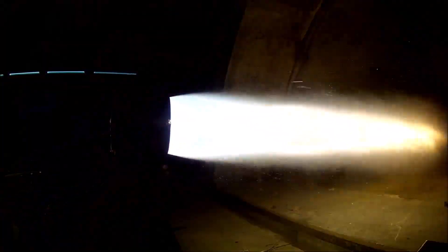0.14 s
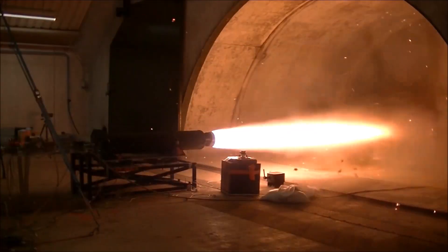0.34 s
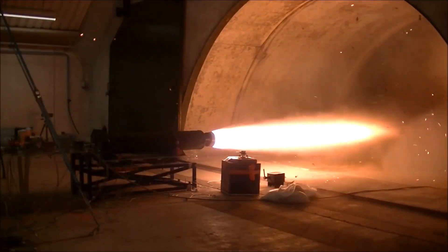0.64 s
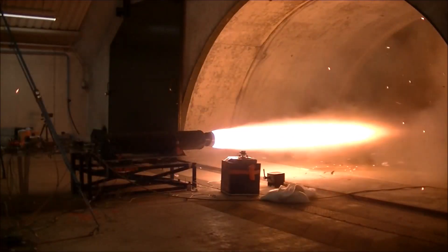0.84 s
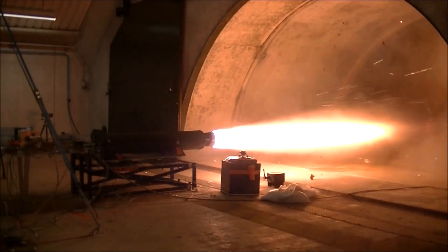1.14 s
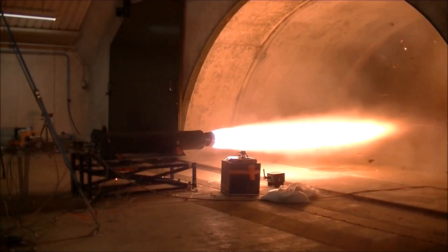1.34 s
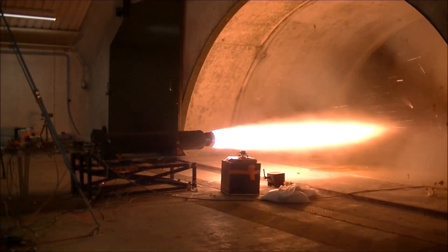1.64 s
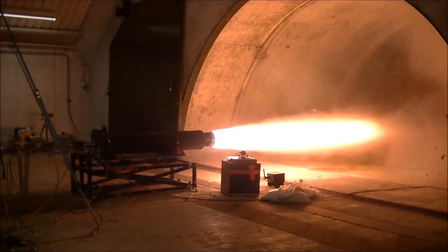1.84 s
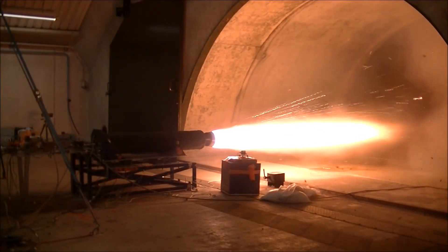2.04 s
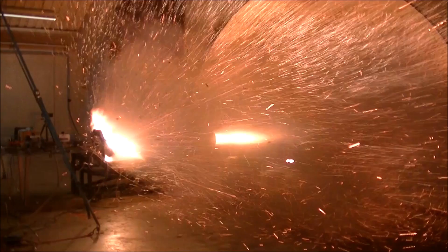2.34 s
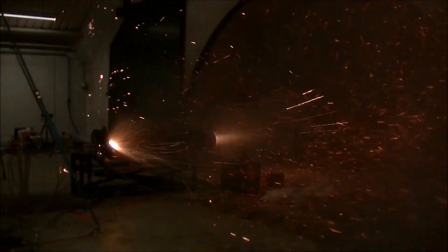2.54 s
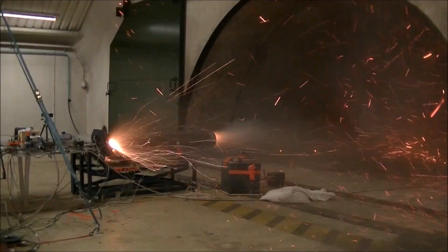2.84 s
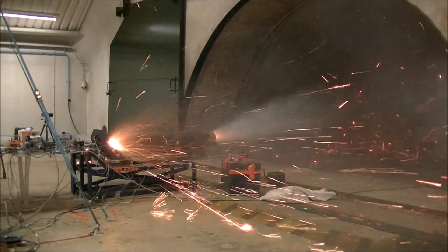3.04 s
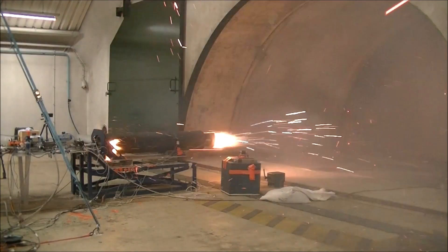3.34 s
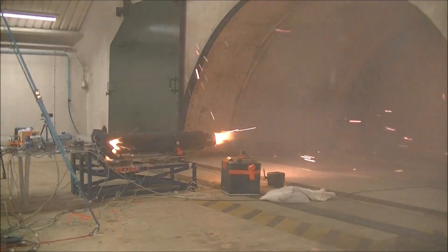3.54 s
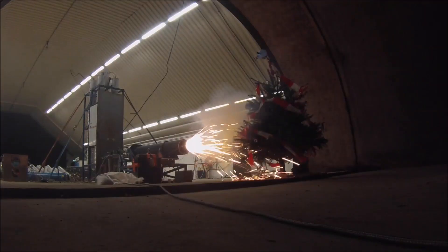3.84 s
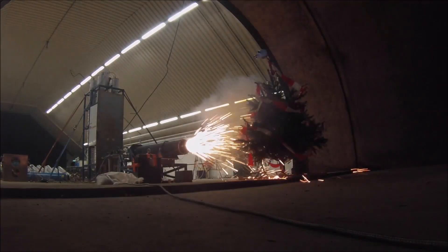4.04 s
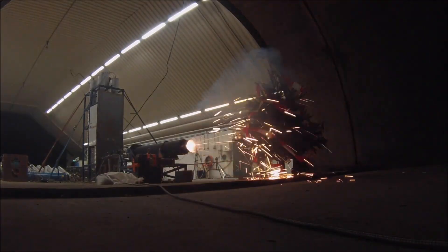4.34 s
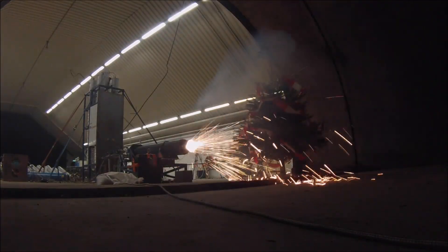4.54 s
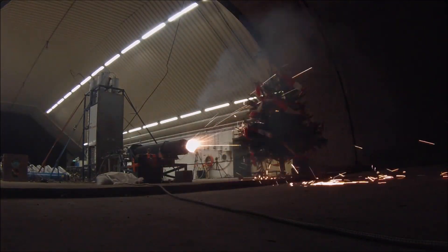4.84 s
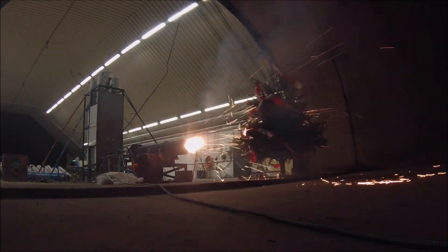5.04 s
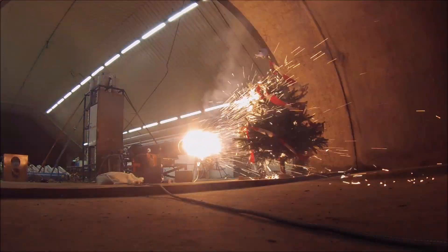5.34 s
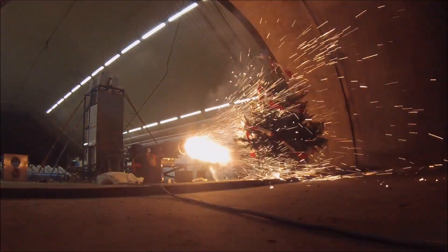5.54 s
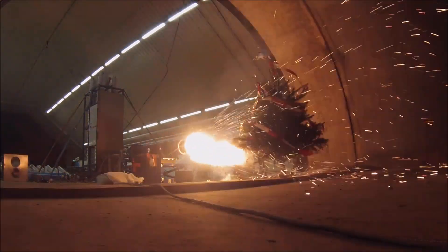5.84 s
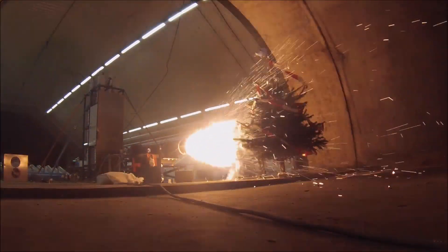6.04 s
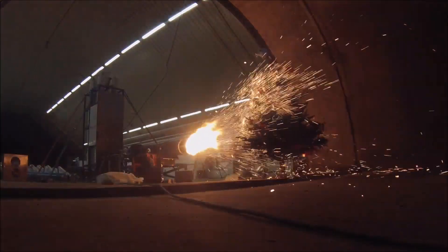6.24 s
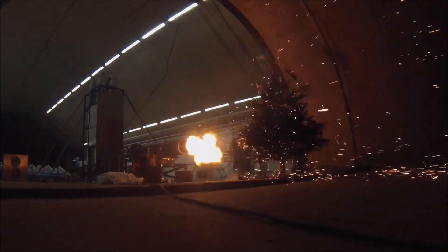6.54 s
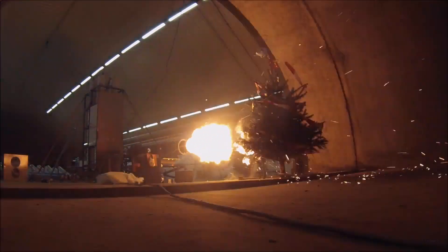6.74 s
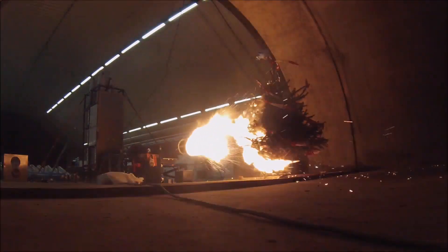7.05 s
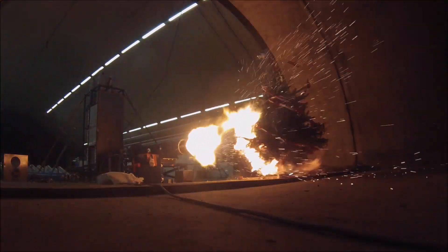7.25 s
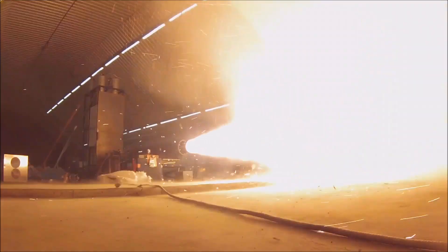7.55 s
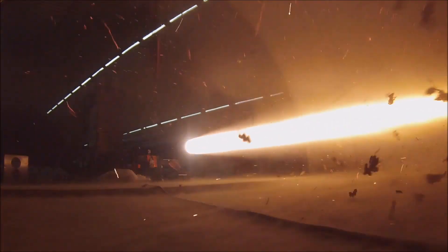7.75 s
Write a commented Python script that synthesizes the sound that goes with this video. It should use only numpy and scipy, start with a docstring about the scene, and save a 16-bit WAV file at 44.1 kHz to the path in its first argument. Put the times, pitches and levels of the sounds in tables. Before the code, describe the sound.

A loud bright rocket jet hiss dulls and fades, then abruptly a second motor chugs hollowly, rasps and spits sparks, thumps and bursts into a roaring jet.

```python
"""Two rocket motors fire in a concrete tunnel, one after the other; the scene changes abruptly from the first
to the second. The first is a steady, bright jet hiss: noise in three bands, read slower and dulled as the motor
burns out. The second starts on its igniter: noise through casing and tunnel resonances roars hollowly, and
filtered noise rasps, wheezes and spits sparks. Then the fuel lights with a thump, one swing of pressure, and a
full jet saturates the microphone. The first motor is in stereo, the second the same in both channels."""
import sys
import numpy as np
from scipy import signal
from scipy.fft import rfft, irfft, next_fast_len
from scipy.io import wavfile
from scipy.ndimage import uniform_filter1d, map_coordinates

SR = 44100
rng = np.random.default_rng(int(sys.argv[2]) if len(sys.argv) > 2 else 0)


def unload_wav(signal):
    """Save mono or channel-first audio to the path in sys.argv[1] as 16-bit WAV at rate SR, clipped to [-1, 1]."""
    wavfile.write(
        sys.argv[1],
        SR,
        np.round(np.clip(np.atleast_2d(signal).T, -1, 1) * 32767).astype(np.int16),
    )


N = 348831
TIME = np.arange(N) / SR
SIZE = next_fast_len(N, True)
FREQS = np.maximum(np.fft.rfftfreq(SIZE, 1 / SR), 1)

# the scene changes to the second motor; its ignition thump; its fuel lights
SCENE_CHANGE_S, THUMP_S, LIGHT_S = 3.797, 7.384, 7.405

# Resonances of the motor casing. Each row: centre in Hz, width in Hz, level in dB.
CASING_RESONANCES = [(265, 63, -6.5), (337.2, 15.7, -0.5), (411, 34, -6.5), (480.5, 28.5, -7.5),
                     (582, 83, -17)]
# Colour of the rasp at the nozzle. Each row: frequency in Hz, relative level in dB.
RASP_COLOUR = [(500, -10.5), (720, -0.5), (900, -8.5), (1100, -4), (1250, 0), (1430, -5), (1600, -11.5),
               (2000, -15), (2400, -28), (4000, -58)]
# Colour of the sparks' fizz. Each row: frequency in Hz, relative level in dB.
FIZZ_COLOUR = [(1800, -10), (2700, -3.5), (3200, 3), (3800, -0.5), (4300, -2.5), (4900, 1), (6000, 2),
               (6600, -5), (7100, -11), (7900, -4), (8700, -15), (10500, -17), (15000, -44)]


def from_db(db):
    """Decibels to gain."""
    return 10 ** (np.asarray(db) / 20)


def rms_one(x):
    """Scale to rms 1."""
    return x / np.sqrt(np.mean(x ** 2) + 1e-20)


def curve(rows):
    """Interpolate rows of (seconds, value) to one value a sample."""
    seconds, values = np.transpose(rows)
    return np.interp(TIME, seconds, values)


def since(start):
    """Seconds gone by since a moment; 0 before it."""
    return np.maximum(TIME - start, 0)


def after(start, fade):
    """A ramp from 0 to 1, fade seconds long and centred on a moment."""
    return np.clip((TIME - start) / fade + .5, 0, 1)


def swell(s, width):
    """A smooth bump of height 1 around a moment."""
    return np.exp(-((TIME - s) / width) ** 2)


def colour(points):
    """Gain at each frequency from (Hz, dB) points."""
    hz, db = np.transpose(points)
    return from_db(np.interp(np.log(FREQS), np.log(hz), db))


def resonances(modes):
    """Gain at each frequency of independently driven resonances, given as (Hz, width Hz, dB)."""
    power = 0
    for hz, width, db in modes:
        detuning = (FREQS ** 2 - hz ** 2) / (FREQS * width)
        power = power + from_db(db) ** 2 / (1 + detuning ** 2)
    return np.sqrt(power)


def below(hz, order=4):
    """Gain of a smooth low-pass."""
    return 1 / np.sqrt(1 + (FREQS / hz) ** (2 * order))


def above(hz, order=4):
    """Gain of a smooth high-pass."""
    return 1 / np.sqrt(1 + (hz / FREQS) ** (2 * order))


def filtered(x, gain):
    """Give a sound the given gain at each frequency."""
    return irfft(rfft(x, SIZE) * gain, SIZE)[:N]


def noise(gain):
    """Random turbulence with the given gain at each frequency; rms 1."""
    return rms_one(filtered(rng.standard_normal(SIZE), gain))


def flutter(rate_hz, depth_db):
    """A factor that wanders at random, mostly slower than rate_hz, with an rms swing of depth_db."""
    return from_db(depth_db * noise(below(rate_hz, order=2)))


def steadied(x, span):
    """Hold the level over a span in seconds at 1 and keep the quicker beating."""
    return x / np.sqrt(uniform_filter1d(x ** 2, max(int(span * SR), 1)) + 1e-9)


def hollow_note(hz, half_width_hz):
    """A narrow, noisy resonance that follows a moving pitch."""
    phase = 2 * np.pi * np.cumsum(hz) / SR
    narrow = below(half_width_hz, order=2)
    return noise(narrow) * np.cos(phase) + noise(narrow) * np.sin(phase)


def reflections(strength, count=8):
    """Echoes from floor and walls comb a fine, steady ripple into the spectrum."""
    delays_s = rng.uniform(.002, .03, count)
    echoes = np.exp(-2j * np.pi * FREQS * delays_s[:, None]).sum(axis=0)
    return np.abs(1 + strength * echoes)


def jet(core_db, body_db, fine_db, points, speed=1):
    """Mixing noise of a plume, pitched by exhaust speed: large eddies give body, the smallest fine hiss."""
    low_hz, high_hz = 3300, 6200   # body below, fine hiss above, core between
    position = np.cumsum(speed * np.ones(N))   # a slower exhaust reads the eddies out more slowly
    eddies = map_coordinates(noise(colour(points)), [position], order=3, mode="mirror")
    body = filtered(eddies, below(low_hz, order=8) ** 2)
    core = filtered(eddies, (above(low_hz, order=8) * below(high_hz, order=8)) ** 2)
    fine = filtered(eddies, above(high_hz, order=8) ** 2)
    body = steadied(body, span=0.21)
    core = steadied(core, span=0.35)
    fine = steadied(fine, span=0.59) * flutter(rate_hz=60, depth_db=0.57)
    return from_db(core_db) * (core + from_db(body_db) * body + from_db(fine_db) * fine)


def first_motor(burnout_dulling=0.74):
    """A jet that dulls as it slows; the microphone rounds its peaks, the tunnel spreads its low part wide."""
    # Colour of the first plume. Each row: frequency in Hz, relative level in dB.
    burn_colour = [(90, -43), (170, -35.5), (280, -19), (600, -15.5), (1000, -13), (2000, -6.5), (3000, -3),
                   (3700, -3), (4500, -2.5), (5400, -4.5), (7000, -11), (9500, -12.5), (12000, -18),
                   (15800, -25.5)]
    # Stereo spread of the plume. Each row: frequency in Hz, side-to-mid ratio in dB, relative.
    burn_width = [(60, -16), (110, 17), (200, 15.5), (380, 8.5), (700, 7.5), (1290, 3), (2380, -3),
                  (4400, -6), (8120, -6), (15000, -111)]
    # full thrust ahead of the microphone: the core, and the low body and fine hiss re the core
    full_core_db, full_body_db, full_fine_db = -21, -6.5, -4
    # the fuel runs low: the exhaust slows, then the flame goes out
    tail_off_s, slowing_per_s = 2.65, .22
    burnout_s, burnout_db_per_s = 3.557, 25
    # change for each dB of exhaust speed; body and fine hiss re the core
    core_follows, body_follows, fine_follows = 0.92, -2.3, 2.9
    # the fine hiss opens up at the start, while the low body settles
    opening_s, opening_fine_db, opening_body_db = 0.21, -4.5, 2

    speed = 1 - slowing_per_s * since(tail_off_s).clip(max=SCENE_CHANGE_S - tail_off_s)
    speed_db = 20 * np.log10(speed)
    opening = np.maximum(1 - TIME / opening_s, 0)
    burnout_db = -burnout_db_per_s * since(burnout_s).clip(max=SCENE_CHANGE_S - burnout_s)
    dulling_db = burnout_dulling * burnout_db
    core_db = full_core_db + core_follows * speed_db + burnout_db
    body_db = full_body_db + body_follows * speed_db - dulling_db + opening_body_db * opening
    fine_db = full_fine_db + fine_follows * speed_db + dulling_db + opening_fine_db * opening
    plume = jet(core_db, body_db, fine_db, burn_colour, speed)

    ceiling = .245   # the microphone's limit, full scale 1
    direct = ceiling * np.tanh(from_db(3.5) * plume / ceiling)
    direct = signal.sosfilt(signal.butter(2, 205, "high", fs=SR, output="sos"), direct)
    floor = from_db(-62.5) * noise(below(87, order=3))   # faint rumble of the tunnel
    spread = from_db(-28.7) * noise(colour(burn_colour) * colour(burn_width))
    spread = spread * np.sqrt(from_db(core_db - full_core_db))   # the echoes fade more slowly than the jet
    stereo = direct + floor + spread * [[1], [-1]]
    return stereo * from_db([[-.15], [.15]])   # slightly louder on the right


def casing_roar(flow_db, upper_ratio=1.72):
    """Burning gas drives the casing in chugs; two resonances climb with the hot chamber's speed of sound."""
    # level at peak flow, and the share of the flow's swing that it follows
    roar_db, roar_follows = -12, 0.52
    # a hollow note sets in and rises as the chamber heats, then sinks into the roar
    heat_s, heating_s, cold_hz, hot_hz = 4.27, .62, 248.7, 360.5
    start_db, hold_s, fade_db_per_s, late_db = -2.5, 0.75, 14, -11
    chug_hz, chug_width_hz, chug_rms_db = 8, 4.7, 1.0
    boom_width_s, boom_db = 0.026, 4.5   # the casing booms with the ignition thump
    lit_fade_db_per_s = 34   # once the fuel lights, the roar dies away in the tunnel

    note_hz = hot_hz + (cold_hz - hot_hz) * np.exp(-since(heat_s) / heating_s)
    note_db = np.maximum(start_db - fade_db_per_s * since(heat_s + hold_s), late_db)
    lower = steadied(hollow_note(note_hz, half_width_hz=14.6), span=.15)
    upper = from_db(-8.5) * hollow_note(note_hz * upper_ratio, half_width_hz=14)
    fixed_modes = noise(resonances(CASING_RESONANCES) * above(282, order=4) * below(600, order=5))
    roar = fixed_modes + after(heat_s, fade=0.097) * from_db(note_db) * (lower + upper)

    chug_db = chug_rms_db * noise(resonances([(chug_hz, chug_width_hz, 0)]) ** 2)
    level_db = roar_db + roar_follows * flow_db + chug_db
    level_db = level_db + boom_db * swell(THUMP_S, boom_width_s) - lit_fade_db_per_s * since(LIGHT_S)
    return from_db(level_db) * steadied(roar, span=.07)


def flame(flow_db, howl_hz=1290):
    """The flame shakes the tunnel's low modes and rasps at the nozzle with a wavering howl."""
    # Low resonances of the tunnel. Each row: centre in Hz, width in Hz, level in dB.
    tunnel_modes = [(16, 14, -10), (35, 9.7, -16), (62, 15, -6), (78.9, 8.4, 3), (99, 18, -23),
                    (117.5, 24, -2.5), (181, 52, -12)]
    # The rumble swells as the fuel starts to smoulder. Each row: time in seconds, level in dB.
    rumble_level = [(3.81, -35.5), (4.03, -34), (4.2, -22), (4.6, -25), (5.5, -26.5), (5.97, -19.5),
                    (6.3, -23.5), (7.38, -21.5)]
    rumble_fade_db_per_s = 68   # dies away in the tunnel from the thump on
    # rasp level at peak flow, and the share of the flow's swing that it follows
    rasp_db, rasp_follows = -23.5, 1.34

    rumble_db = curve(rumble_level) - rumble_fade_db_per_s * since(THUMP_S)
    modes = sum(from_db(db) * resonances([(hz, width, 0)]) ** 2 for hz, width, db in tunnel_modes)
    rumble = steadied(noise(modes), span=0.34) * flutter(rate_hz=10, depth_db=1.0)
    howl = hollow_note(howl_hz * flutter(rate_hz=5, depth_db=0.39), half_width_hz=58)
    rasp = noise(colour(RASP_COLOUR) * reflections(strength=0.2)) + from_db(-5.5) * howl
    rasp = steadied(rasp, span=0.093)
    rasp = rasp * flutter(rate_hz=59, depth_db=0.85) * flutter(rate_hz=10, depth_db=0.86)
    return from_db(rumble_db) * rumble + from_db(rasp_db + rasp_follows * flow_db) * rasp


def sparks(choke_share=.8):
    """Gas wheezes from the nozzle, burning grains spray out in gusts and the smouldering fuel sizzles."""
    # Gas wheezing from the nozzle. Each row: time in seconds, level in dB.
    wheeze_level = [(3.8, -37.5), (4.25, -44), (4.45, -33.5), (4.7, -42), (5.3, -43), (5.6, -39.5),
                    (6.4, -39.5), (6.7, -42.5), (7.35, -39)]
    # Colour of the wheeze. Each row: frequency in Hz, relative level in dB.
    wheeze_colour = [(600, -8), (1500, 4.5), (2000, -4.5), (2400, -6), (2800, -0.5), (3200, 2.5),
                     (3600, -5.5), (4000, -12), (6000, -23), (10000, -49)]
    # Gusts of sparks. Each row: time in seconds, level in dB.
    spray_level = [(3.83, -77), (4.26, -52.5), (4.39, -37), (4.52, -40.5), (4.84, -38), (5.0, -45),
                   (5.05, -35), (5.39, -36), (5.45, -48.5), (5.8, -49), (6.1, -42.5), (6.8, -45.5),
                   (7.3, -42), (7.38, -37)]
    # Colour of the sizzle. Each row: frequency in Hz, relative level in dB.
    sizzle_colour = [(3500, -7), (5000, -1.5), (7000, -2.5), (8800, -1), (10200, -1.5), (11300, -8.5),
                     (12400, -6), (15400, -13)]
    spray_sizzle_db = -14.5   # the sparks' own sizzle re their fizz
    # the fuel starts to smoulder and a fine sizzle comes in
    smoulder_s, rise_s, smoulder_db, climb_db_per_s = 5.85, 0.46, -47, 2

    walls = reflections(strength=0.079)
    wheeze = from_db(curve(wheeze_level)) * noise(colour(wheeze_colour) * walls)
    spray = from_db(curve(spray_level)) * flutter(rate_hz=16, depth_db=0.8)
    fizz = spray * noise(colour(FIZZ_COLOUR) * walls) * flutter(rate_hz=50, depth_db=1.7)
    smoulder = after(smoulder_s, rise_s) * from_db(smoulder_db + climb_db_per_s * since(smoulder_s))
    sizzle_gain = np.hypot(from_db(spray_sizzle_db) * spray, smoulder)
    sizzle = sizzle_gain * noise(colour(sizzle_colour) * walls) * flutter(rate_hz=80, depth_db=1.1)
    hiss = from_db(-72) * noise(colour(sizzle_colour))   # faint steady hiss under it all
    until_lit = 1 - after(LIGHT_S, fade=0.14)
    return (wheeze + fizz + sizzle) * from_db(choke_share * choking()) * until_lit + hiss


def spits(width=0.0073):
    """Lumps of igniter leave the nozzle with soft puffs that rasp and knock on the casing."""
    # Spits of the igniter. Each row: time in seconds, knock level in dB, rasp and fizz level in dB.
    spit_events = [(4.214, -17, -41), (4.326, -13, -38), (4.545, -11, -40), (5.483, -15, -27.5),
                   (5.55, -14, -45), (5.696, -14, -34), (5.939, -12.5, -43), (6.325, -15, -27.5),
                   (6.589, -11.5, -46), (6.77, -16, -42), (6.859, -17, -29.5)]
    knock = steadied(noise(resonances(CASING_RESONANCES) * above(205) * below(530)), span=.02)
    rasp = noise(colour(RASP_COLOUR)) + from_db(-11.5) * noise(colour(FIZZ_COLOUR))
    puffs = 0
    for s, knock_db, rasp_db in spit_events:
        puffs = puffs + swell(s, width) * (from_db(knock_db) * knock + from_db(rasp_db) * rasp)
    return puffs


def choking():
    """The nozzle chokes: each time the flow drops quickly and creeps back; in dB."""
    # Chokes of the nozzle. Each row: time in seconds, drop in dB if recovery did not set in meanwhile.
    chokes = [(5.42, 6), (5.725, 7.5), (6.61, 5.5)]
    fall_s, recovery_s = 0.022, 0.045
    return -sum(drop_db * after(s, fall_s) * np.exp(-since(s) / recovery_s) for s, drop_db in chokes)


def thump(width_s=0.0042, peak_db=-9):
    """The fuel catches: one slow swing of pressure, peaking width_s either side of its middle."""
    u = (TIME - THUMP_S) / width_s
    return from_db(peak_db) * u * np.exp((1 - u ** 2) / 2)


def full_jet():
    """The fuel lights with a flash, falters for a moment, jumps to full thrust and climbs slowly."""
    # Colour of the full jet. Each row: frequency in Hz, relative level in dB.
    jet_colour = [(200, -13), (800, -7), (1700, 1), (2400, -4), (2850, -1.5), (3200, 2.5), (3700, -6.5),
                  (4300, -10.5), (5000, -9.5), (5900, -7), (7200, -7.5), (9500, -8), (12000, -17),
                  (15400, -27)]
    # core levels ahead of the microphone: the flash, which sags, then full thrust, which climbs
    light_db, flash_s, sag_db_per_s = -29.5, .03, 80
    full_s, full_rise_s, full_db, climb_db_per_s = 7.495, .045, -22, 9
    # re the core: the body swells once as the plume bursts out, and thins as the jet speeds up
    full_body_db, thinning_db_per_s, full_fine_db = 1, 6.5, -8.5
    swell_s, swell_width_s, swell_db = 7.595, 0.061, 3.5

    flash_db = light_db - sag_db_per_s * since(LIGHT_S + flash_s)
    thrust_db = full_db + climb_db_per_s * since(full_s)
    full = after(full_s, full_rise_s)
    core_db = (1 - full) * flash_db + full * thrust_db
    body_db = full_body_db - thinning_db_per_s * since(full_s) + swell_db * swell(swell_s, swell_width_s)
    return jet(core_db, body_db, full_fine_db, jet_colour)


def second_motor():
    """Igniter, thump, then the full jet, which drives the microphone deep into saturation."""
    # Gas flow from the igniter. Each row: time in seconds, flow in dB re its peak.
    igniter_flow = [(3.81, -21), (4.02, -20), (4.2, -10), (4.35, -2.5), (4.8, -1), (5.38, -0.5), (5.5, -6),
                    (5.85, -7.5), (6.2, -3.5), (6.75, -8), (7.15, -6), (7.32, -8), (7.38, -1)]
    flow_db = curve(igniter_flow) + choking()
    igniter = casing_roar(flow_db) + flame(flow_db) + sparks() + spits()
    lit = after(LIGHT_S, fade=0.025)
    sound = igniter + thump() + lit * full_jet()

    ceiling = .35   # the microphone's limit, full scale 1
    saturated = ceiling * np.tanh(from_db(3.5) * sound / ceiling)
    # the input passes no slow pressure
    saturated = signal.sosfilt(signal.butter(1, 45, "high", fs=SR, output="sos"), saturated)
    return (1 - lit) * sound + lit * saturated


def scene():
    """The first firing in stereo, then the second, which is the same in both channels."""
    second = after(SCENE_CHANGE_S, fade=0.0021)
    return (1 - second) * first_motor() + second * second_motor()


def record(dry, cutoff_hz=15650):
    """The highest peaks are rounded and the top of the treble is cut."""
    rounded = dry / (1 + dry ** 6) ** (1 / 6)
    return signal.sosfilt(signal.ellip(14, .1, 90, cutoff_hz, fs=SR, output="sos"), rounded)


dry = scene()
out = record(dry)
unload_wav(out)
```